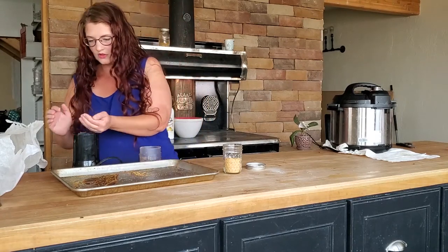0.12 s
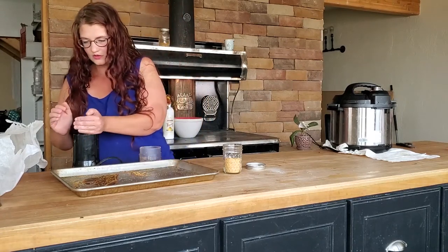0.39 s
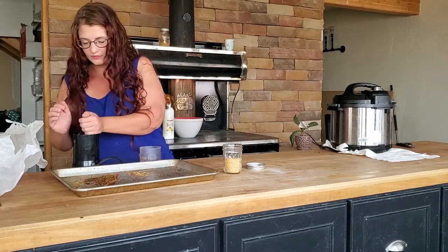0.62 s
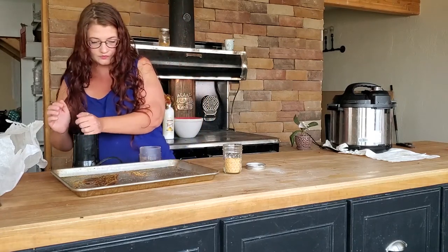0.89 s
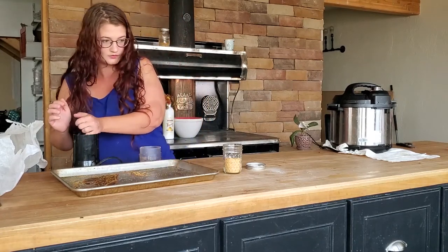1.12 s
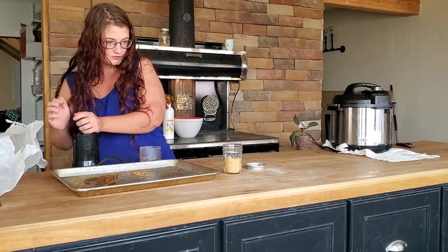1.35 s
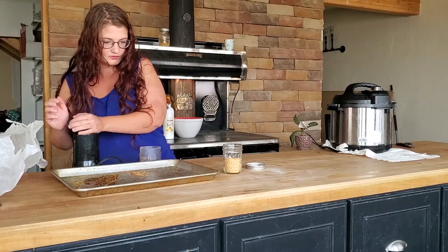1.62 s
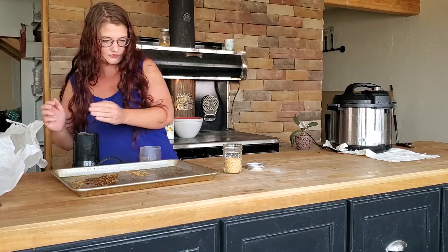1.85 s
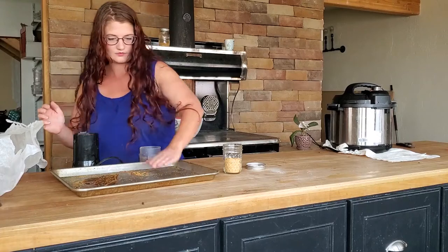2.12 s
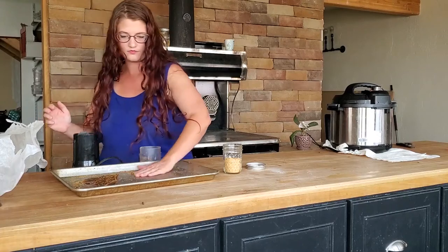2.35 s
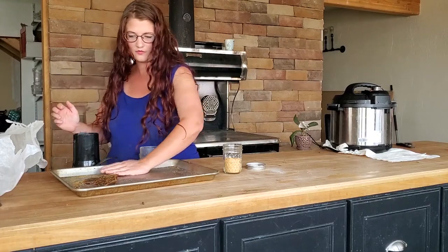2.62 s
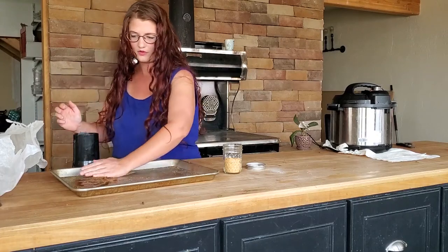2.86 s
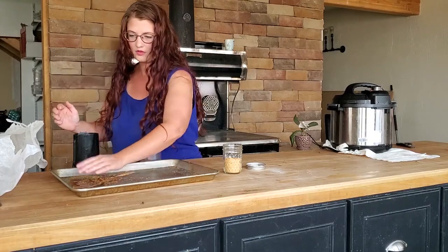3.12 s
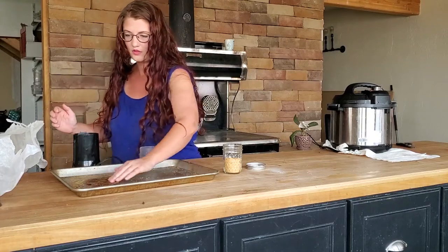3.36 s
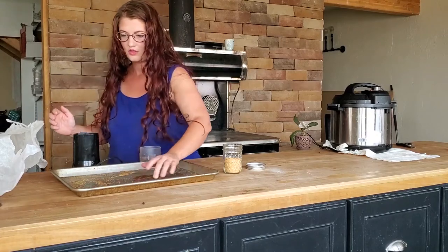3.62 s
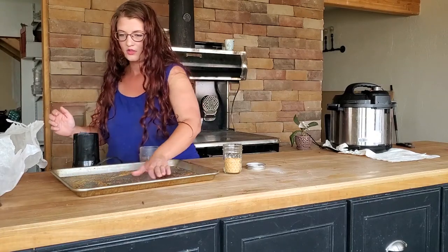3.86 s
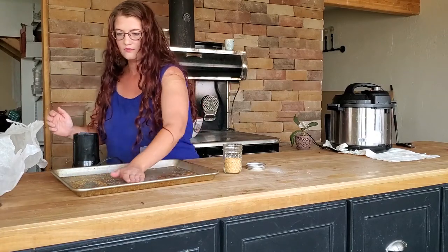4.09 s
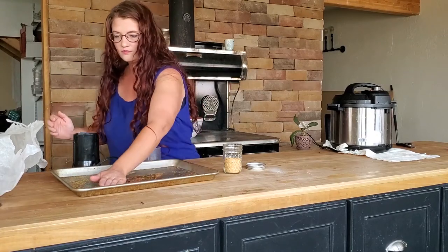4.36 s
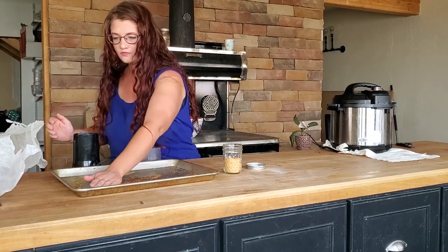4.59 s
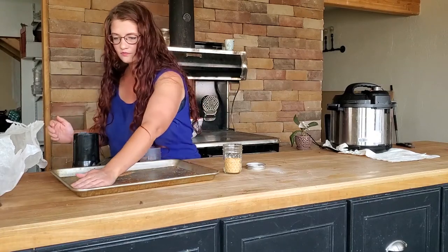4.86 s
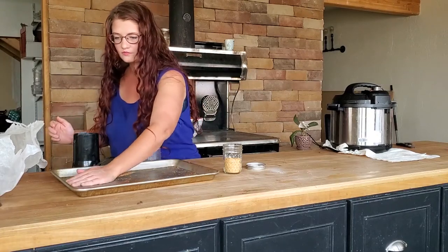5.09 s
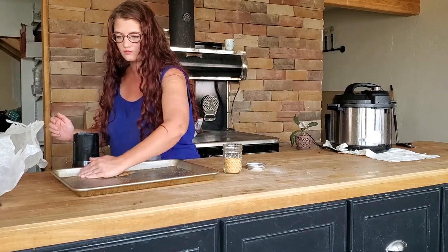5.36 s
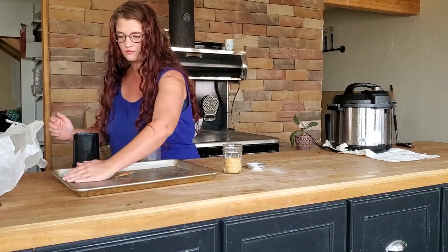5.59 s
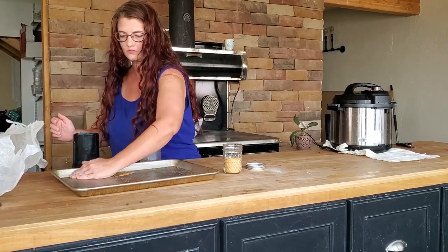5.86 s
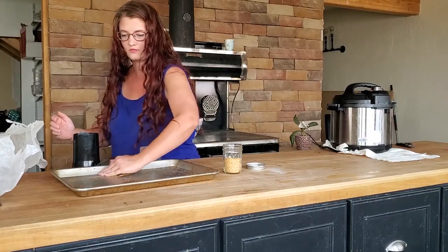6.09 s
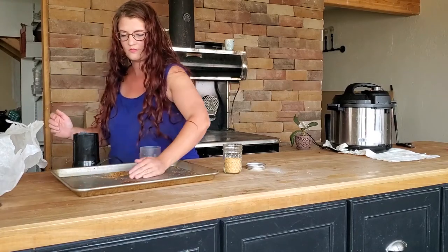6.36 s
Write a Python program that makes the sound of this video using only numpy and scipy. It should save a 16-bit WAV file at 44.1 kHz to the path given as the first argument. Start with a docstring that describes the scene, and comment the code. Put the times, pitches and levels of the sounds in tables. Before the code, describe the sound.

Hard dried pieces skitter and ring across a thin metal baking sheet under a sweeping palm, after a rooster's crow tails off outside.

```python
"""A hand sweeps hard dried pieces over a thin metal baking sheet on a wooden counter, heard mostly from the left.
Random contacts ring the sheet's modes, crumbs hiss as filtered grit, and palm thumps are short low flexes.
First a handful of pieces trickles into a small steel cup, as grit with wall resonances,
and a rooster outside ends its crow, as wavering partials with a rasp.
A refrigerator hums throughout: steady tones over coloured air noise."""
import sys
import numpy as np
from scipy import signal
from scipy.fft import rfft, irfft, next_fast_len
from scipy.io import wavfile
from scipy.ndimage import uniform_filter1d, map_coordinates

SR = 44100
rng = np.random.default_rng(int(sys.argv[2]) if len(sys.argv) > 2 else 0)


def generate_wav(signal):
    """Clip the signal to [-1, 1] and save it as 16-bit WAV at the path in sys.argv[1]."""
    frames = np.transpose(np.atleast_2d(signal))
    scaled = np.clip(frames, -1, 1) * 32767
    pcm = np.round(scaled).astype(np.int16)
    wavfile.write(sys.argv[1], SR, pcm)


def natural_amplitude(level_db):
    """Convert a level in decibels to a linear amplitude factor, elementwise."""
    exponent = np.asarray(level_db, float) / 20
    return 10 ** exponent


N = 285327
T = np.arange(N) / SR  # time [s]

# The palm slides over the sheet; the level columns are for its fastest moment. The last slide is still
# gathering speed when the sound ends; its early stop time only steepens that rise a little:
# (start [s], fastest [s], stop [s], rattle of pieces [dB], hiss of crumbs [dB])
SLIDES = [(2.074, 2.422, 2.82, -54, -45.5), (2.454, 2.72, 2.8, -63, -53.5), (2.736, 2.825, 3.05, -38, -45),
          (3.229, 3.452, 3.7, -27.5, -34.5), (3.342, 3.644, 3.9, -32.5, -38),
          (3.673, 3.832, 3.96, -43, -49), (4.0, 4.227, 4.473, -40, -38.5),
          (4.532, 4.709, 4.873, -39.5, -44), (4.792, 4.894, 5.13, -41.5, -41),
          (4.85, 5.116, 5.53, -52, -41), (5.103, 5.309, 5.495, -52.5, -45.5),
          (5.525, 5.754, 5.95, -55, -50), (5.695, 5.93, 6.3, -52, -43), (5.902, 6.083, 6.31, -60, -53),
          (6.377, 6.52, 2.7, -43.5, -46)]
# The hand knocks a heap of pieces over the sheet or against its rim:
# (time [s], rattle [dB], hiss [dB], weight of low and high modes [dB], t60 [s])
KNOCKS = [(1.3594, -82, -65.5, -4, 0.082), (2.1196, -77, -51.5, -8, 0.18),
          (2.771, -37.5, -45.5, -3.5, 0.34), (2.8872, -35.5, -50.5, -0.5, 0.54),
          (3.05, -51.5, -72, 6.5, 0.15), (3.2662, -41, -51, 4.5, 0.17), (3.322, -18.5, -57, -25.5, 0.26),
          (3.3735, -23.5, -35.5, -1.5, 0.16), (4.164, -34, -48, -1, 0.22),
          (4.326, -32.5, -28.5, 10.5, 0.049), (4.333, -27, -32, -0.5, 0.51), (4.579, -38, -46, -7.5, 0.23),
          (4.8394, -46, -46.5, -4, 0.12), (4.891, -45, -50, -7, 0.052), (5.5134, -68, -61, -9, .25),
          (5.6121, -61.5, -62, 0, 0.23), (5.701, -45.5, -59, -10, 0.2), (5.8124, -46.5, -45.5, 5.5, 0.14),
          (5.8671, -49.5, -60, 7, 0.083)]
# Colour of the crumbs' hiss: (frequency [Hz], density [dB per Hz])
HISS_COLOUR = [(880, -41), (1500, -16), (2600, -2.5), (3800, 0.5), (4700, -9.5), (6600, -4.5), (8000, -9.5),
               (11000, -8.5), (14200, -4), (15800, -5)]
# Colour of the counter's rumble: (frequency [Hz], density [dB per Hz])
RUMBLE_COLOUR = [(30, -10), (60, 2), (130, 5), (300, 2.5), (700, -8), (1200, -36.5)]
# Stereo lean of the sheet and the cup's patter: (frequency [Hz], left over right [dB])
SHEET_LEAN = [(60, 2), (110, -3), (200, 5.5), (380, 0.5), (700, 7.5), (1290, 8), (2380, 13), (4400, 13.5),
              (8120, 10), (15000, 8)]
HISS_STEEP = 1.28  # the hiss follows the speed more steeply than the rattle
SLIDE_LOW_DB = -1.5  # weight of the low and high modes while sliding
RUMBLE_DB, RUMBLE_GROWS = -39, 0.41  # rumble at a rattle of 0 dB; dB gained per dB of rattle
THUMP_RUMBLE_DB, THUMP_RUMBLE_T60_S = -18, 0.44  # rumble relative to a thump; its decay


def sweeps():
    """Pieces skitter and ring the sheet at two moving spots; crumbs hiss under the palm; the counter rumbles."""
    slides = [(slide(*when), db, hiss_db) for *when, db, hiss_db in SLIDES]
    push = sum(natural_amplitude(db + shape_db) for shape_db, db, _ in slides) * natural_amplitude(0.95 * wobble(25))
    palm = sum(natural_amplitude(hiss_db + HISS_STEEP * shape_db) for shape_db, _, hiss_db in slides)
    rub = palm * natural_amplitude(1.1 * wobble(30))
    heavy = push * natural_amplitude(SLIDE_LOW_DB)
    for s, db, hiss_db, low_db, t60 in KNOCKS:  # each knock is a sudden spray of pieces
        push = push + dying(s, db, t60)
        heavy = heavy + dying(s, db + low_db, t60)
        rub = rub + dying(s, hiss_db, t60)

    strikes = push * contacts(rate=3500, spread_db=3.0)
    spot = rng.integers(2, size=N)
    ring = sum(moving(strikes * (spot == k), sheet_ring, .12) for k in range(2))
    rattle = np.std(strikes) * ports(ring, RATTLE_COLOUR, SHEET_LEAN)
    # the weight changes only the modes on either side of the middle ones
    outer = filtered(rattle, lambda hz: 1 / (1 + (hz / 2500) ** 10) + 1 / (1 + (3900 / (hz + 1)) ** 10))
    rattle += (uniform_filter1d(heavy / push, size=300) - 1) * outer

    crumbs = grit(rub, rate=9800, spread_db=2.0, t60=0.012)
    hiss = np.std(rub) * ports(crumbs, HISS_COLOUR, SHEET_LEAN)

    weight = natural_amplitude(RUMBLE_DB) * push ** RUMBLE_GROWS
    for s, db, _ in THUMPS:
        weight = weight + dying(s, db + THUMP_RUMBLE_DB, THUMP_RUMBLE_T60_S, attack_s=0.012)
    noise = ports(rng.standard_normal((2, N)), RUMBLE_COLOUR, SHEET_LEAN)
    rumble = weight * natural_amplitude(0.6 * wobble(20)) * noise
    return rattle + hiss + rumble


START_DB, STOP_DB, ROUND = 30, 36, 2.02  # depth below the peak at start and stop; flatness of the top


def slide(start, fastest, stop):
    """Level in dB of one slide: it gathers speed, peaks at 0 dB and slows to a stop."""
    before = np.clip((fastest - T) / (fastest - start), 0, 3)
    after = np.clip((T - fastest) / (stop - fastest), 0, 3)
    return -START_DB * before ** ROUND - STOP_DB * after ** ROUND


# Strong modes of the sheet: (frequency [Hz], typical level before random changes [dB])
SHEET_MODES = [(958.2, -64), (1470, -58), (1626, -56.5), (1733, -58), (2024, -49), (2132, -51), (2331, -53),
               (2449, -53), (2638, -56.5), (2756, -52), (2859, -45), (2993, -57), (3122, -48.5),
               (3241, -47), (3413, -50.5), (4102, -52)]
# Colour of the rattling sheet: (frequency [Hz], density [dB per Hz])
RATTLE_COLOUR = [(240, -46.5), (400, -21.5), (884, -10.5), (1610, -3), (1880, -8), (2400, -2.5),
                 (4100, -10), (6670, -21), (7380, -14), (8500, -24.5), (11000, -48), (18700, -120)]


def sheet_ring(modes_db=-7, t60=0.055, click_db=-9):
    """The sheet struck at one spot: the contact click, strong modes at new strengths, a thicket of weak ones."""
    thicket = tail([(500, 0.13), (3000, 0.13), (8000, 0.023)], .2)
    t = np.arange(thicket.shape[1]) / SR
    modes = 0
    for hz, db in SHEET_MODES:
        # the rattle's colour is taken out here because it is applied to the whole ring later
        strength_db = db + rng.normal(0, 7.1, (2, 1)) - along(RATTLE_COLOUR, hz)
        modes = modes + natural_amplitude(strength_db - 60 * t / t60) * np.sin(2 * np.pi * (hz * t + rng.random((2, 1))))
    click = natural_amplitude(click_db) * (t == 0)
    return click + thicket + natural_amplitude(modes_db) * modes / np.linalg.norm(modes, axis=1, keepdims=True)


# The palm comes down on the sheet: (time [s], level before the soft attack [dB], flex frequency [Hz])
THUMPS = [(3.598, -28.5, 157), (4.181, -40, 172), (4.349, -30, 110), (4.685, -33, 149), (4.999, -36, 60.6),
          (5.415, -31.5, 121), (6.172, -28.5, 108)]


def thumps():
    """Soft blows: a few cycles of the sheet flexing on the counter, with a higher flex that dies sooner."""
    out, t = np.zeros(N + SR), np.arange(SR // 5) / SR
    for s, db, hz in THUMPS:
        higher = 1.2 * natural_amplitude(-60 * t / 0.12) * np.sin(2 * np.pi * 1.55 * hz * t)
        flex = np.sin(2 * np.pi * hz * t) + higher
        out[round(s * SR):][:len(t)] += natural_amplitude(db - 60 * t / 0.068) * (1 - np.exp(-t / 0.0047)) * flex
    return out[:N]


# Resonances of the cup's steel wall: (frequency [Hz], width [Hz], relative level [dB])
CUP_WALL = [(7900, 70, 5), (9900, 60, 1), (12150, 80, -2), (14800, 110, -3)]
# Colour of the falling pieces: (frequency [Hz], density [dB per Hz])
TRICKLE_COLOUR = [(880, 4), (1700, 0.5), (2300, -7), (3200, 0.5), (5100, -8), (7500, -7.5), (10500, -9),
                  (13000, -1), (15800, -4.5)]
POUR_S, POUR_ATTACK_S, POUR_LENGTH_S, POUR_DB = 0.2, 0.0082, .21, -59  # the handful falls into the cup
POUR_SAG_DB_S, POUR_END_DB_S = 21, 190  # it thins out, then runs dry [dB per s]


def cup():
    """Falling pieces patter into the cup and ring the resonances of its steel wall."""
    t = np.maximum(T - POUR_S, 0)
    db = POUR_DB - POUR_SAG_DB_S * t - POUR_END_DB_S * np.maximum(t - POUR_LENGTH_S, 0)
    fall = natural_amplitude(db + 0.96 * wobble(43.3)) * np.minimum(t / POUR_ATTACK_S, 1)
    wall = lambda f: sum(natural_amplitude(g) * 1j * f * w / (c * c - f * f + 1j * f * w) for c, w, g in CUP_WALL)
    patter = grit(fall, rate=8000, spread_db=3.5, t60=0.031)
    ring = filtered(patter / (1 + (T / .35) ** 14), wall)  # weakens once the cup's floor is covered
    ring = natural_amplitude([[3], [-8]]) * unit(ring)  # stronger on the left
    return np.std(fall) * (natural_amplitude(5.0) * ports(patter, TRICKLE_COLOUR, SHEET_LEAN) + ring)


# The crow's course: (time [s], pitch [Hz], level [dB], 2nd partial over it [dB])
CROW = [(0, 736, -52, 6.5), (.1, 726.4, -48, 8), (.145, 715, -50, 1.5), (.23, 687, -50.5, -1.5),
        (.26, 686, -53, -7), (.295, 690, -66, -5)]
# Extra partials that fade from the start: (multiple of the pitch, level at 0 s [dB])
EXTRA_PARTIALS = [(1.5, -56), (2.5, -58.5), (3, -62.5), (8, -70)]
# Colour of the throat's rasp: (frequency [Hz], density [dB per Hz])
RASP_COLOUR = [(700, -24), (1200, 3), (2000, -9), (2550, -16), (3300, -12.5), (3850, 0.5), (4300, -19),
               (5500, -32)]
# Closing low note: (time [s], pitch [Hz], level [dB])
GROAN = [(.2, 585, -50), (.26, 606, -49.5), (.31, 558, -47), (.37, 520, -67)]
# The held note still echoing outside: (frequency [Hz], level at 0 s [dB])
HELD_ECHO = [(728, -58), (1458, -54), (2900, -63)]
# Stereo lean of the rooster and the refrigerator: (frequency [Hz], left over right [dB])
FAR_LEAN = [(60, 1), (130, -3), (290, 4.5), (640, 4.5), (1410, 13.0), (3100, 22), (6820, 30), (15000, -10)]
RASP_DB = -11  # relative to the crow's level
FOURTH_DB, FOURTH_DB_S = -14.5, 63  # 4th partial relative to the crow at 0 s; its growth [dB per s]


def rooster():
    """Partials on a sagging, shaky pitch, some at half multiples; the throat rasps; a low note closes."""
    hz, crow_db, second_db, gate = curves(CROW)
    partials = [(1, 0), (2, second_db), (4, FOURTH_DB + FOURTH_DB_S * T * gate)]
    turns = np.cumsum(hz * (1 + .012 * wobble(140))) / SR
    voice = sum(natural_amplitude(crow_db + db + 3.5 * wobble(62.3)) * np.sin(2 * np.pi * k * turns) for k, db in partials)
    for k, db in EXTRA_PARTIALS:
        voice += natural_amplitude(db - 60 * T / .3 + 3 * wobble(50)) * np.sin(2 * np.pi * k * turns)
    rasp = unit(filtered(rng.standard_normal(N), lambda f: natural_amplitude(along(RASP_COLOUR, f))))
    voice += natural_amplitude(crow_db + RASP_DB) * rasp

    low_hz, low_db, low_gate = curves(GROAN)
    low_turns = np.cumsum(low_hz * (1 + .07 * wobble(150))) / SR
    groan = natural_amplitude(low_db + 4 * wobble(90)) * np.sin(2 * np.pi * low_turns)
    call = voice * gate + groan * low_gate
    echo = sum(natural_amplitude(db - 60 * T / 1.3 + 3 * wobble(50)) * np.sin(2 * np.pi * f * T) for f, db in HELD_ECHO)
    heard = call + echo + natural_amplitude(-9) * through(call, tail([(500, .3), (3000, .25)], .4))
    return filtered(heard, lambda f: natural_amplitude(np.outer([.2, -.8], along(FAR_LEAN, f))))  # mostly shapes the right


# Hum at multiples of the shaft speed: (shaft order, level [dB rms])
HUM = [(3, -75.5), (5, -68.5), (6, -75), (7, -78.5), (8, -67.5), (10, -80), (11, -66), (13, -74.5)]
# Sidebands above the mains buzz: (shaft orders above it, level [dB rms])
MAINS_SIDEBANDS = [(1, -70.5), (16, -82), (20, -74), (22, -75.5), (24, -78.5)]
# Colour of the air noise: (frequency [Hz], density [dB per Hz])
AIR_COLOUR = [(15, -56), (25, -21), (53, -8), (123, -3.5), (184, -9), (316, -10.5), (620, -20.5),
              (791, -19), (1730, -40.5), (2810, -48.5), (3880, -36), (6660, -51), (7420, -57), (14200, -46),
              (15800, -62)]
# How alike the air noise is at the two ports: (frequency [Hz], left-right likeness)
AIR_ALIKE = [(60, 0.74), (180, 0.76), (550, 0.18), (1650, -0.34), (4970, 0.026), (15000, 0.22)]
SHAFT_HZ, MAINS_HZ, FAN_HZ = 28.09, 120.0, 59.1
IN_STEP_S = 0.833  # a moment when the 4th shaft order and the mains buzz add up
AIR_DB = -58.5


def refrigerator():
    """Shaft orders, mains buzz sidebands and a fan line, a little unsteady, with a slow beat over air noise."""
    tones = [(k * SHAFT_HZ, db) for k, db in HUM]
    tones += [(MAINS_HZ + k * SHAFT_HZ, db) for k, db in MAINS_SIDEBANDS]
    tones += [(FAN_HZ, -57)]
    lines = 0
    for hz, db in tones:
        side_db = np.outer([.5, -.5], along(FAR_LEAN, hz))
        level = natural_amplitude(db + 3 + 1.2 * wobble(6) + side_db)  # 3 dB from rms to peak
        lines = lines + level * np.cos(2 * np.pi * (hz * T + rng.random()))
    beating = ((4 * SHAFT_HZ, -59), (MAINS_HZ, -62))
    throb = sum(natural_amplitude(db + 2.5) * np.cos(2 * np.pi * hz * (T - IN_STEP_S)) for hz, db in beating)
    noise = ports(rng.standard_normal((2, N)), AIR_COLOUR, FAR_LEAN, AIR_ALIKE, 0)
    air = natural_amplitude(AIR_DB + 0.73 * wobble(3.3)) * noise
    return lines + throb + air


# Reverberation of the kitchen: (frequency [Hz], t60 [s])
KITCHEN = [(150, 0.95), (1500, 0.8), (5000, 0.55), (14000, 0.45)]


def kitchen_walls(near):
    """The walls answer 500 samples late with noise tails that are renewed every quarter second."""
    late = np.pad(near, ((0, 0), (500, 0)))[:, :N]
    return moving(late, lambda: tail(KITCHEN, 0.39), .25)


# How alike the near sounds are at the two ports: (frequency [Hz], left-right likeness)
NEAR_ALIKE = [(100, 0.88), (300, 0.93), (600, 0.57), (1200, 0.27), (2700, 0.78), (7000, 0.068)]
LEAD_S = .0001  # near sounds reach the left port first


def ports(pair, spectrum, lean, alike=NEAR_ALIKE, lead_s=LEAD_S):
    """Two unrelated signals become left and right with a set colour, likeness, lean and lead; mean of rms 1."""
    turn = lambda hz: np.arccos(np.clip(along(alike, hz), -1, 1)) / 2
    mid, side = filtered(pair, lambda hz: natural_amplitude(along(spectrum, hz)) * [np.cos(turn(hz)), np.sin(turn(hz))])

    def sides(hz):
        level = natural_amplitude(np.outer([.5, -.5], along(lean, hz)))
        return level * np.exp(2j * np.pi * np.outer([.5, -.5], hz) * lead_s)

    out = filtered(np.array([mid + side, mid - side]), sides)
    return out / np.std(out.mean(0))


def grit(level, rate, spread_db, t60):
    """Countless tiny contacts all over the metal, unrelated at the two ports, each lingering for t60."""
    linger = natural_amplitude(-120 * np.arange(SR // 8) / SR / t60)  # decay of the power
    power = np.abs(signal.fftconvolve(level ** 2, linger / linger.sum())[:N])
    return np.sqrt(power) * [contacts(rate, spread_db), contacts(rate, spread_db)]


def contacts(rate, spread_db):
    """Random sharp contacts, rate a second, a few much harder than the rest."""
    hit = rng.random(N) < rate / SR
    hardness_db = spread_db * np.minimum(rng.exponential(size=N), 4)
    return unit(hit * natural_amplitude(hardness_db) * rng.choice([-1, 1], N))


def moving(x, response, step_s):
    """x heard from a place that moves on every step_s: each stretch gets a new response."""
    out, size = np.zeros((2, N + SR)), int(step_s * SR)
    fade = signal.windows.hann(2 * size, sym=False)
    for i in range(0, N - size, size):
        part = x[..., i:i + 2 * size]
        heard = through_all(part * fade[:part.shape[-1]], response())
        out[:, i:i + heard.shape[1]] += heard
    return out[:, :N]


def through_all(x, responses):
    """x convolved with each response, with the full tail."""
    return signal.fftconvolve(np.atleast_2d(x), responses, axes=1)


def through(x, responses):
    """x convolved with each response, cut to the scene's length."""
    return through_all(x, responses)[:, :N]


def tail(t60, length_s):
    """A pair of noise tails of energy 1, each frequency dying at its own speed."""
    hz, t, z = signal.stft(rng.standard_normal((2, int(length_s * SR))), SR, nperseg=256)
    out = signal.istft(z * natural_amplitude(-60 * t / along(t60, hz)[:, None]), SR, nperseg=256)[1]
    return out / np.linalg.norm(out, axis=1, keepdims=True)


def dying(s, db, t60, attack_s=0.00049):
    """A level that jumps up at s and dies away."""
    t = np.maximum(T - s, 0)
    return np.minimum(t / attack_s, 1) * natural_amplitude(db - 60 * t / t60)


def wobble(rate):
    """A smooth random curve, rate knots a second."""
    return map_coordinates(rng.standard_normal(int(N * rate / SR) + 4), [T * rate])


def curves(rows):
    """One value per sample for each column after the time, and a gate that is open inside the table."""
    s, *cols = np.transpose(rows)
    gate = uniform_filter1d(1. * (T >= s[0]) * (T <= s[-1]), size=400, mode="nearest")
    return [np.interp(T, s, c) for c in cols] + [gate]


def along(points, hz):
    """(frequency, value) points read along a log frequency axis."""
    f, v = np.transpose(points)
    return np.interp(np.log(hz + 1), np.log(f + 1), v)


def filtered(x, response):
    """x times a response of frequency."""
    m = next_fast_len(x.shape[-1] + 8192)
    return irfft(rfft(x, m) * response(np.fft.rfftfreq(m, 1 / SR)), m)[..., :x.shape[-1]]


def unit(x):
    """Scaled to rms 1."""
    return x / np.sqrt(np.mean(x ** 2) + 1e-20)


def scene():
    """The near sources, their answer from the kitchen walls, and the background."""
    near = sweeps() + thumps() + cup()
    return near + natural_amplitude(-18.0) * kitchen_walls(near) + rooster() + refrigerator()


def band_limit(x):
    """A steep low-pass at the top of the band."""
    return signal.sosfilt(signal.butter(12, 16770, fs=SR, output="sos"), x)


# A notch in the microphone's treble: (frequency [Hz], gain [dB])
MIC = [(6800, 0), (7250, -10), (7600, -8.5), (8500, -2.5), (12000, -2)]


def record(dry):
    """The microphone colours the treble, and the band ends at 15.83 kHz."""
    coloured = filtered(dry, lambda hz: natural_amplitude(along(MIC, hz)))
    mix = filtered(coloured, lambda hz: hz < 15830)
    return band_limit(mix)


dry = scene()
out = record(dry)
generate_wav(out)
```